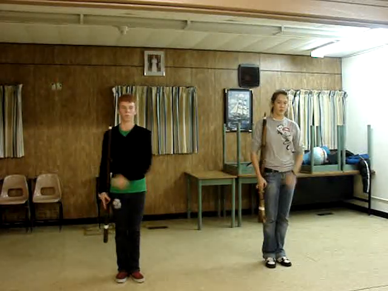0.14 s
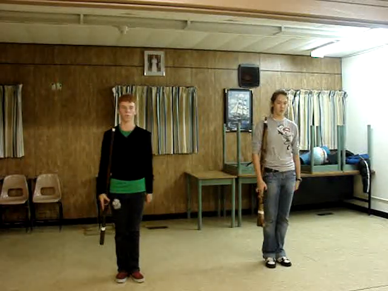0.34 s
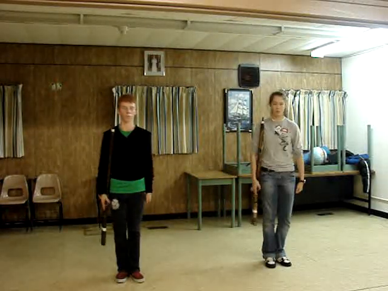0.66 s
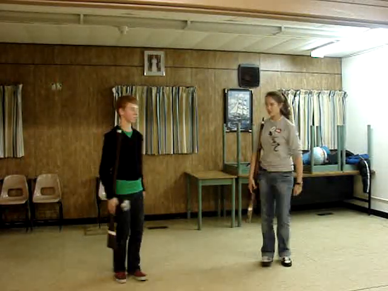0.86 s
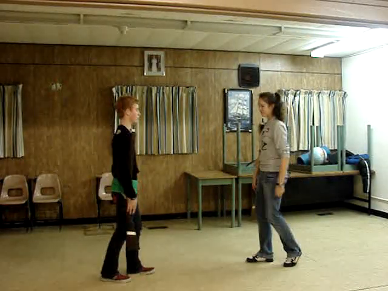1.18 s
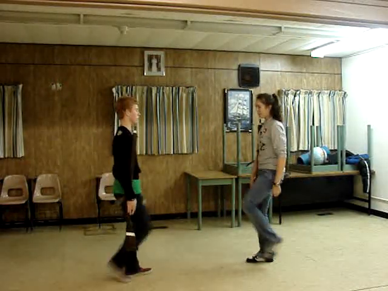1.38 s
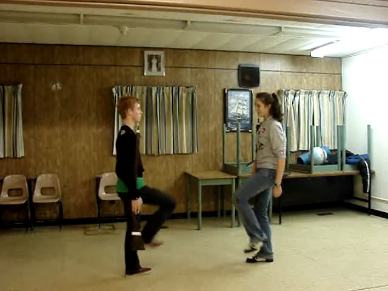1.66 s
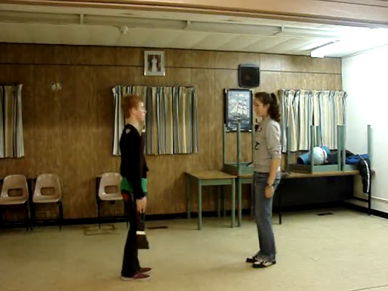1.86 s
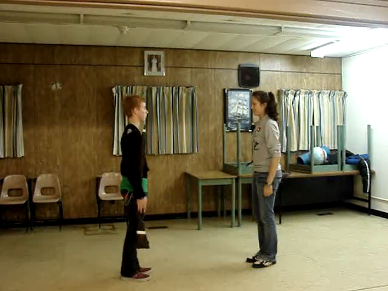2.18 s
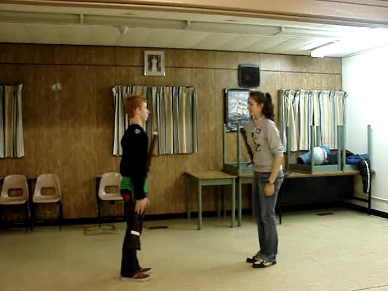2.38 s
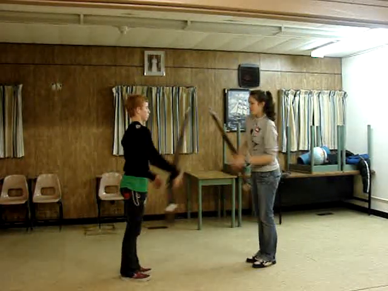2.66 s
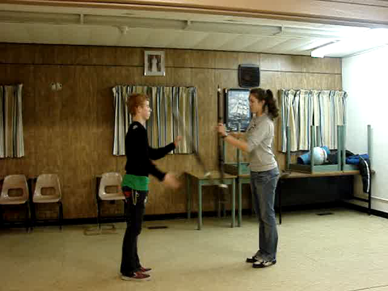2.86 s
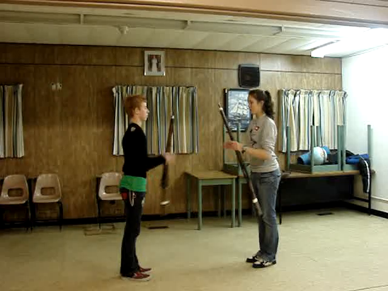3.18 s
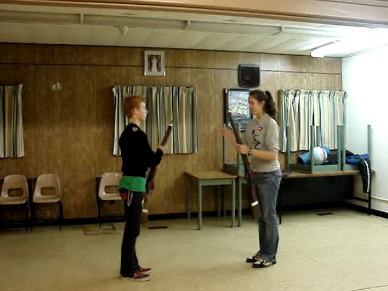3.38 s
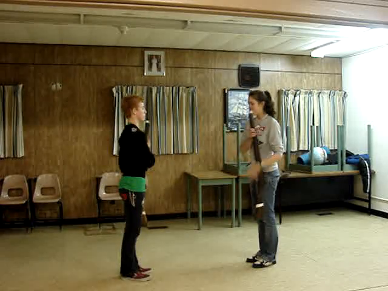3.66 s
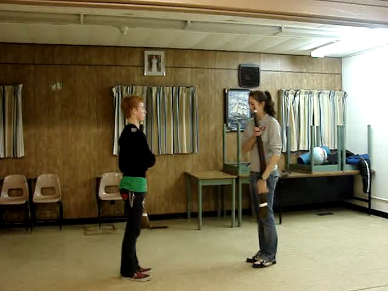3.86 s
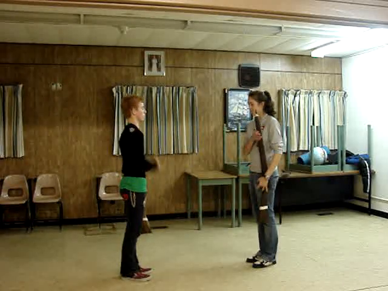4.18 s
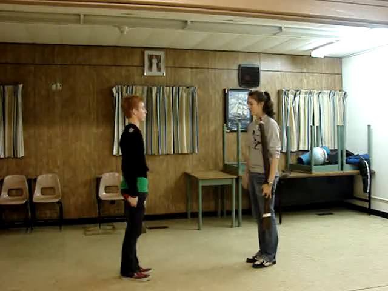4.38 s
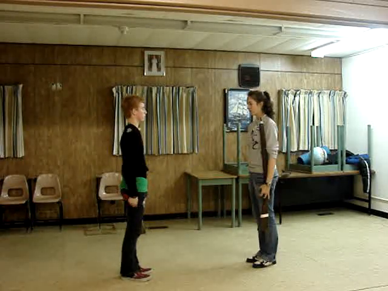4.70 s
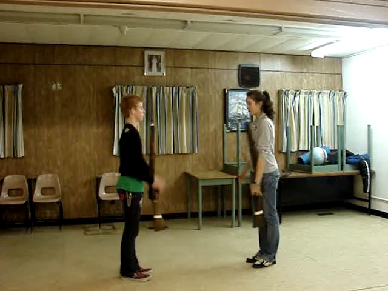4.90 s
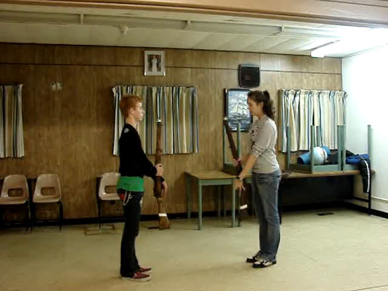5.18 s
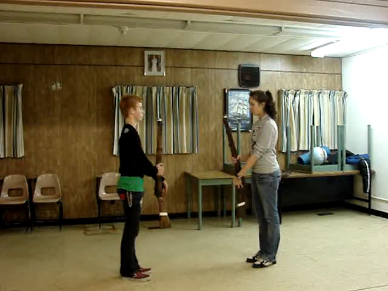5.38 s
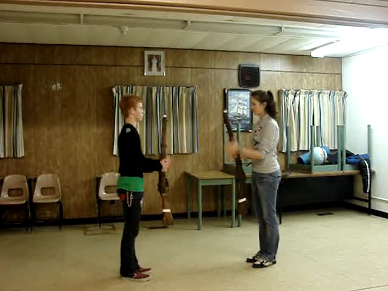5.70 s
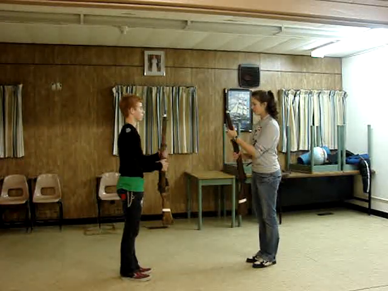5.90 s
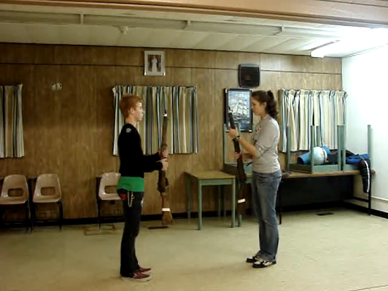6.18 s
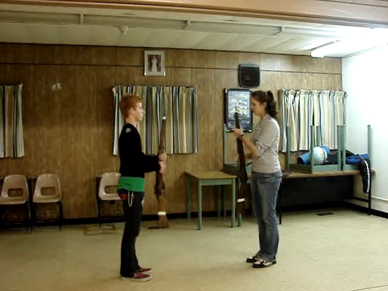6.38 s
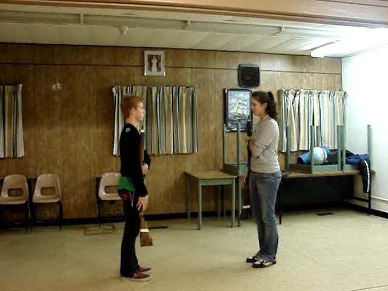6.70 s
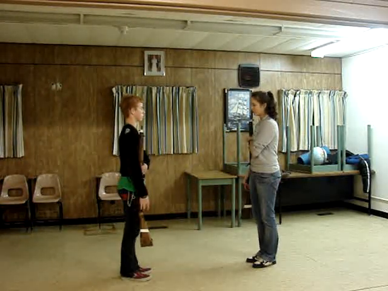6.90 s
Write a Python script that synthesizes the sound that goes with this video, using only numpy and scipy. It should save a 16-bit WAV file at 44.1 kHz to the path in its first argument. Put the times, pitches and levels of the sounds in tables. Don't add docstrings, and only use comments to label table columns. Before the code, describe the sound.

In a low, hard-walled hall, two people drill with wooden rifles a few metres from a small camera microphone. Soft wood bumps and a tiny rattle come first, then shuffling soles, a descending squeak and a hard heel stamp. After a short pause, palms slap the stocks in quick clusters, with hollow knocks and small metal ticks between. Each blow rings for about a second over faint hiss and hum.

```python
import sys
import numpy as np
from scipy import signal
from scipy.io import wavfile
from scipy.ndimage import uniform_filter1d, minimum_filter1d

SR = 44100
rng = np.random.default_rng(int(sys.argv[2]) if len(sys.argv) > 2 else 0)


def makeup_ratio(level_db):
    decades = np.asarray(level_db, float) / 20
    return 10 ** decades


def bounce(signal):
    frames = np.transpose(np.atleast_2d(signal))
    limited = np.clip(frames, -1, 1)
    pcm = np.round(limited * 32767).astype(np.int16)
    wavfile.write(sys.argv[1], SR, pcm)


N = 310464

# start_s [s], crack_db [dB], stock_knock_db [dB], snap_db [dB]
SLAPS = [(2.7167, -18.5, -7.5, -29), (2.7607, -32.5, 5, 2), (2.929, -8.5, -8, -15),
         (3.021, -6.5, -17.5, -18.5), (3.389, -17, -6.5, -18), (3.4936, -14.5, -3.5, -14.5),
         (3.809, -20.5, -13, -17), (4.8494, -31, -7, -17), (5.0799, -4, -11.5, -14.5),
         (5.8721, -7.5, -7, -11), (5.956, -12.5, -4.5, -17.5), (6.4205, -31.5, -2.5, -24.5),
         (6.6389, -8.5, -2, -11), (6.6965, -8.5, -4, -16)]
# start_s [s], crack_db [dB], stock_knock_db [dB], snap_db [dB]
KNOCKS = [(0.041, -31, 4, -35), (0.2423, -24.5, 6, -20.5), (3.0365, -20.5, 9, -0.5),
          (3.7864, -30.5, 16.5, -34), (3.8408, -28.5, 4, -12.5), (4.1715, -37, 12.5, -27),
          (4.359, -37, 8.5, -28), (4.372, -28.5, 2.5, -26), (5.188, -23, 3.5, -11), (6.5144, -37, -3, -9.5)]
# start_s [s], crack_db [dB], stock_knock_db [dB], snap_db [dB]
TICKS = [(0.363, -34.5, -20, -13), (0.619, -27.5, -16, -21), (1.7292, -11, -23, -8), (2.388, -28, -10, -9),
         (2.497, -25.5, -6.5, -8.5), (2.7021, -32, 3, -41), (4.021, -34, -25, 1.5),
         (4.1458, -33, -24, -10.5)]
# start_s [s], crack_db [dB], knock_db [dB], snap_db [dB]
HEELS = [(0.0217, -43, 0, -35), (0.742, -33, -6, -19), (0.9145, -27.5, -6, -13.5), (1.61, -27.5, -4, -48),
         (1.8972, -2, -10.5, -19), (1.9624, -8, -7, -40)]
# thud_db [dB], palm_db [dB]
CONTACT_BODY = [
    (-25.5, -6),
    (-18, -1.5),
    (-58, -11.5),
    (-10, -8.5),
]
SHARE_HZ = [130, 400, 850, 1600, 3300, 7200]
# (start_s [s], level_db [dB])
WOOD_PARTS = [
    (852, 110, [(0, -48), (1.28, -38.5), (2.497, -58), (2.88, -60), (3.868, -50), (4.178, -51), (5.578, -50), (5.69, -54), (6.545, -48), (6.636, -35)]),
    (434, 470, [(1.4, -34), (1.899, -21), (3.23, -53.5)]),
    (819, 76, [(3.035, -28), (3.783, -32.5), (3.822, -31.5), (4.37, -43)]),
    (2830, 210, [(3.82, -39.5), (4.17, -46)]),
    (486, 134, [(1.9, -24.5), (4.37, -54), (5.87, -46)]),
    (1130, 350, [(1.905, -18.5), (6.711, -28)]),
    (1570, 300, [(0.245, -39), (2.72, -44.5)]),
    (1765, 230, [(5.099, -21.5)]),
    (2270, 340, [(1.069, -26.5), (6.702, -36)]),
]
# (start_s [s], level_db [dB])
HARD_PARTS = [
    (2970, 850, [(0.618, -57), (2.935, -22), (4.86, -48.5), (5.95, -42)]),
    (2510, 3600, [(0, -43.5), (5.077, -39.5), (6.634, -24.5)]),
    (4570, 250, [(1.74, -32.5), (2.76, -44.5), (4.86, -54.5), (5.63, -59)]),
    (4900, 2400, [(1.025, -25), (4.86, -59), (5.08, -29.5), (6.518, -48)]),
    (7450, 1000, [(1.41, -48), (4.55, -58)]),
    (9860, 360, [(2.76, -41), (3.929, -43.5)]),
]


def blows():
    rows = []
    for kind, body in zip((SLAPS, KNOCKS, TICKS, HEELS), CONTACT_BODY):
        rows += [(*row, *body) for row in kind]
    start_s, crack_db, knock_db, snap_db, thud_db, palm_db = np.transpose(rows)
    shares_db = np.array([thud_db - 13.0, thud_db + 0.5, knock_db - 0.5, palm_db + 4.5,
                          0 * start_s, snap_db + 4.0])
    white = rng.standard_normal((3, N)) * makeup_ratio(1.3 * drift(180))
    quirks_db = 1.5 * rng.standard_normal((len(start_s), 27))
    out = struck(start_s, crack_db + knock_db - 0.5, 815.4, 913, white[2])
    for k, (low, high) in list(enumerate(third_octaves()))[6:]:
        centre_hz = np.sqrt(low * high)
        colour_db = [at_hz(np.transpose([SHARE_HZ, shares]), centre_hz) for shares in shares_db.T]
        out += struck(start_s, crack_db + colour_db + quirks_db[:, k], low, high, white[k % 2])
    for hz, width_hz, strikes in WOOD_PARTS + HARD_PARTS:
        part_s, part_db = np.transpose(strikes)
        out += struck(part_s, part_db + 16.5, hz - width_hz / 2, hz + width_hz / 2, white[2])
    return out


def struck(seconds, levels_db, low, high, white):
    contact_t60_s, build_s, echoes_db = 0.0032, 0.0081, -7.5
    at = np.round(np.multiply(seconds, SR)).astype(int)
    first, last = at.min(), min(at.max() + 2 * SR, N)
    hz, power = np.sqrt(low * high), np.zeros(last - first)
    power[at - first] = makeup_ratio(2 * np.asarray(levels_db))
    swell = np.exp(-2 / (build_s * SR))
    echoes = signal.lfilter([1 - swell], [1, -swell], dying(power, at_hz(HALL_T60, hz) / 2))
    direct = dying(power, (contact_t60_s + 3.0 / hz) / 2)
    envelope = np.sqrt(direct + makeup_ratio(2 * echoes_db) * echoes)
    burst = envelope * rms_one(band(white[first:last], low, high))
    return np.pad(band(burst, low / 2, min(2 * high, SR / 2.2)), (first, N - last))


# start_s [s], level_db [dB]
CLACKS = [(0.2423, -22.5), (2.5, -28), (2.72, -24.5), (3.393, -20), (5.0829, -13), (5.1917, -14),
          (5.869, -11), (5.953, -6.5), (6.643, -9.5)]


def clacks():
    hits = np.zeros(N)
    for start_s, db in CLACKS:
        hits[round(start_s * SR)] = -makeup_ratio(db + 9.0)
    return band(hits, 1500, 9600)


# start_s [s], boom_db [dB], board_db [dB]
STAMPS = [(0.659, -79, -53), (1.219, -71, -57), (1.4, -49, -65), (1.47, -52, -51.5), (1.734, -70, -66),
          (1.905, -29, -35.5)]
# pitch_hz [Hz], level_db [dB], t60_s [s]
SLAB = [
    [(45.3, -7, 0.78), (71, -6, 0.5)],
    [(139, 3.5, 0.37), (226, 7, 0.46), (263, 8, 0.49)],
]


def stamps():
    out = np.zeros(N)
    for modes, strengths_db in zip(SLAB, np.transpose(STAMPS)[1:]):
        hits = np.zeros(N)
        hits[[round(row[0] * SR) for row in STAMPS]] = makeup_ratio(strengths_db)
        for hz, db, t60_s in modes:
            r, w = makeup_ratio(-60 / (t60_s * SR)), 2 * np.pi * hz / SR
            ringing = signal.lfilter([0, np.sin(w)], [1, -2 * r * np.cos(w), r * r], hits + 1e-18)
            out += makeup_ratio(db) * ringing
    return out


# start_s [s], length_s [s], pitch_hz [Hz], level_db [dB]
SQUEAKS = [(0.956, .03, 3444, -20.5), (0.944, 0.075, 2795, -32.5), (0.987, 0.028, 3120, -16),
           (1.022, 0.0263, 2834, -15.5), (1.019, .035, 2542, -25.5), (1.053, .02, 2710, -31),
           (1.088, 0.038, 2366, -26), (1.107, .05, 2216, -31.5), (1.734, 0.0654, 4150, -25.5)]


def squeaks():
    slip_edge_s = .005
    sag_per_s = .4
    t, out = np.arange(N) / SR, np.zeros(N)
    clock = np.cumsum(1 + .014 * drift(250)) / SR
    for start_s, length_s, hz, db in SQUEAKS:
        edge = np.minimum(t - start_s, start_s + length_s - t)
        gate = np.clip(edge / slip_edge_s + .5, 0, 1)
        overtone_db = -13 - 17.5 * np.log2(hz / 3000)
        phase = 2 * np.pi * hz * (clock - sag_per_s * (t - start_s - length_s / 2) ** 2 / 2)
        out += makeup_ratio(db) * gate * (np.sin(phase) + makeup_ratio(overtone_db) * np.sin(2 * phase))
    return out * makeup_ratio(3.0 * drift(56))


# start_s [s], length_s [s], level_db [dB], bright_grit_db [dB], floor_rumble_db [dB]
SHUFFLE = [(.75, 0.065, -51.5, -18, -18), (0.863, 0.092, -44, -23, -21), (0.989, 0.12, -35.5, 3, -27),
           (1.165, 0.18, -37, -9.5, -26), (1.391, 0.075, -36.5, 3.5, -22), (1.489, 0.18, -36.5, -9, -17.5)]
# start_s [s], length_s [s], level_db [dB]
RUSTLE = [(2.35, 0.5, -46), (3.7, 0.83, -47.5), (4.88, 0.059, -43.5), (6.5, .15, -51.5)]


def friction():
    cloth_bright_db, drag_db = -23, -8
    grit = rng.standard_normal((4, N)) * makeup_ratio(2.2 * drift(40))
    *_, bright_db, rumble_db = np.transpose(SHUFFLE)
    soles = strokes(SHUFFLE, 0 * bright_db)
    cloth = strokes(RUSTLE, np.zeros(len(RUSTLE)))
    body = (makeup_ratio(2.0) * soles + cloth) * rms_one(band(grit[0], 840, 3270))
    bright_level = strokes(SHUFFLE, bright_db) + makeup_ratio(cloth_bright_db) * cloth
    bright = bright_level * rms_one(band(grit[1], 2900, 11000))
    drag = makeup_ratio(drag_db) * soles * rms_one(band(grit[2], 220, 900))
    rumble = strokes(SHUFFLE, rumble_db) * rms_one(band(grit[3], 30, 99))
    return body + bright + drag + rumble


def strokes(rows, shares_db):
    rise_db_s, fall_db_s = 297, 149.5
    t, power = np.arange(N) / SR, 0
    for (start_s, length_s, db, *_), share_db in zip(rows, shares_db):
        before_db = rise_db_s * np.maximum(start_s - t, 0)
        after_db = fall_db_s * np.maximum(t - start_s - length_s, 0)
        power = power + makeup_ratio(2 * np.maximum(db + share_db - (before_db + after_db), -200))
    return np.sqrt(power)


# start_s [s], level_db [dB]
CATCH = [(.6065, -46), (0.6187, -27), (0.6267, -31.5)]


def catch():
    hits, noise = np.zeros(N), rng.standard_normal((2, N))
    for start_s, db in CATCH:
        hits[round(start_s * SR)] = makeup_ratio(db)
    rattle = rms_one(band(noise[0], 2460, 3700))
    dull = makeup_ratio(-8.0) * rms_one(band(noise[1], 350, 1240))
    return dying(hits, .035) * (rattle + dull)


# pitch_hz [Hz], t60_s [s]
HALL_T60 = [(100, 0.31), (300, 0.44), (600, 0.82), (1000, 0.84), (2000, 1), (4000, 0.81), (7000, 0.63),
            (10000, 0.56)]


def hall(x):
    field_db, build_s = -32.0, .004
    t = np.arange(int(1.6 * SR)) / SR
    echoes, white = np.zeros(len(t)), rng.standard_normal((2, len(t)))
    for k, (low, high) in enumerate(third_octaves()):
        t60_s = at_hz(HALL_T60, np.sqrt(low * high))
        echoes += band(white[k % 2], low, high) * makeup_ratio(-75 * t / t60_s)
    echoes *= makeup_ratio(field_db) * (1 - np.exp(-t / build_s))
    return x + signal.fftconvolve(x, echoes)[:N]


# pitch_hz [Hz], width_hz [Hz], level_db [dB]
MIC = [
    (837, 160, 2.5),
    (3100, 2500, 2),
    (438, 108, 3.5),
]


def capsule(x):
    for hz, width_hz, db in MIC:
        r = np.exp(-np.pi * width_hz / SR)
        pole = [1, -2 * r * np.cos(2 * np.pi * hz / SR), r * r]
        peak = signal.lfilter((1 - r * r) / 2 * np.array([1, 0, -1]), pole, x)
        x = x + (makeup_ratio(db) - 1) * peak
    return x


# start_s [s], level_db [dB]
JOLTS = [(0.988, -36), (1.041, -32), (1.402, -34), (1.484, -33), (1.559, -42), (1.624, -41), (1.734, -30),
         (1.9, -38), (2.936, -49), (3.049, -35), (5.081, -24), (5.87, -33), (6.646, -38), (6.699, -38)]


def jolts():
    hits = np.zeros(N)
    for start_s, db in JOLTS:
        hits[round(start_s * SR)] = makeup_ratio(db)
    return band(dying(hits, 0.11), 10, 350)


# start_s [s], length_s [s], level_db [dB]
HUM_SWELLS = [(3.1, .15, -77), (4.25, .65, -72), (6.6, .4, -80)]


def lamps():
    hum_db, flicker_db = -77.5, 4.5
    level = makeup_ratio(hum_db) + strokes(HUM_SWELLS, np.zeros(len(HUM_SWELLS)))
    return level * makeup_ratio(flicker_db * drift(8)) * np.sin(2 * np.pi * 120 * np.arange(N) / SR)


# pitch_hz [Hz], level_db [dB per Hz]
HISS = [(15, -47), (25, -9), (125, -18), (164, -15), (271, -13.5), (375, -4.5), (561, -10), (903, 2),
        (1050, -5.5), (4610, -18.5), (5500, -18), (9080, -21), (10000, -36), (13100, -75.5), (22000, -120)]


def hiss():
    out, white = np.zeros(N), rng.standard_normal((2, N))
    for k, (low, high) in enumerate(third_octaves()):
        out += makeup_ratio(at_hz(HISS, np.sqrt(low * high))) * band(white[k % 2], low, high)
    return makeup_ratio(-49 + 0.27 * drift(6.6)) * rms_one(out)


def rms_one(x):
    return x / np.sqrt(np.mean(x ** 2) + 1e-20)


def at_hz(points, hz):
    points_hz, values = np.array(points)[:, 0], np.array(points)[:, 1]
    return np.interp(np.log(hz), np.log(points_hz), values)


def band(x, low_hz, high_hz):
    return signal.sosfilt(signal.butter(2, [low_hz, high_hz], "band", fs=SR, output="sos"), x)


def third_octaves():
    edges = 24 * 2 ** (np.arange(28) / 3)
    return list(zip(edges, edges[1:]))


def drift(rate_hz):
    r = np.exp(-2 * np.pi * rate_hz / SR)
    return rms_one(signal.lfilter([1], [1, -2 * r, r * r], rng.standard_normal(N + SR))[SR:])


def dying(x, t60_s):
    return signal.lfilter([1], [1, -makeup_ratio(-60 / (t60_s * SR))], x + 1e-18)


def scene():
    moving = makeup_ratio(-8.5) * blows() + hall(makeup_ratio(0.5) * squeaks()) + stamps() + clacks() + catch() + friction()
    return (capsule(moving) + jolts() + hiss() + lamps())[None]


def starve(x):
    threshold_db, rise_share, chance_db = -31.0, .6, 7.5
    hz, _, frames = signal.stft(x, SR, nperseg=384)
    patch_db = 10 * np.log10(uniform_filter1d(np.abs(frames) ** 2, size=3, axis=0) + 1e-16)
    now_db = np.median(patch_db[(hz > 1000) & (hz < 5000)], axis=0)
    now_db = uniform_filter1d(now_db, size=3)
    coming_db = -minimum_filter1d(-now_db, size=7, origin=-3)
    chance = np.kron(rng.standard_normal(np.array(frames.shape) // 3 + 1), np.ones((3, 3)))
    bar_db = coming_db + threshold_db + rise_share * (coming_db - now_db)
    kept = patch_db > bar_db + chance_db * chance[:len(hz), :len(now_db)]
    kept = kept | (hz < 1100)[:, None]
    return signal.istft(frames * kept, SR, nperseg=384)[1][:N]


def top_cut(x):
    return signal.sosfilt(signal.butter(12, 10190, fs=SR, output="sos"), x)


def record(dry):
    limit_db, squeeze, recover_db_s = -19.5, 0.36, 165
    level_db = 10 * np.log10(signal.lfilter([.004], [1, -.996], dry ** 2) + 1e-12)
    ramp = recover_db_s * np.arange(N) / SR
    held_db = np.maximum.accumulate(level_db + ramp, axis=1) - ramp
    x = dry * makeup_ratio(-squeeze * np.maximum(held_db - limit_db, 0))
    x = 0.75 * np.tanh(x / 0.83)
    x = signal.sosfilt(signal.cheby2(18, 70, 10450, fs=SR, output="sos"), x)
    return top_cut(starve(x[0])[None])


dry = scene()
out = record(dry)
bounce(out)
```